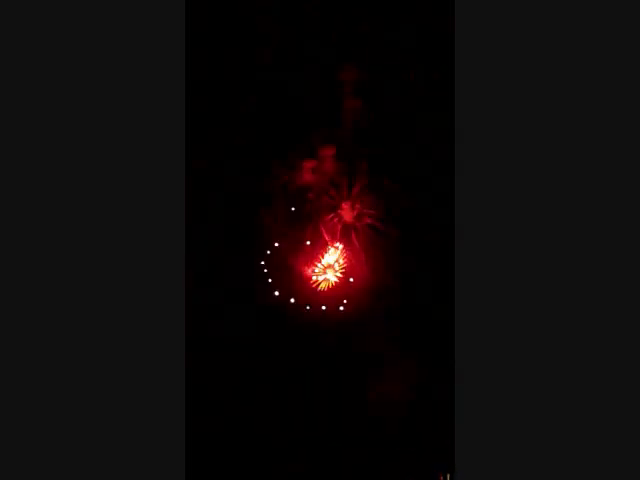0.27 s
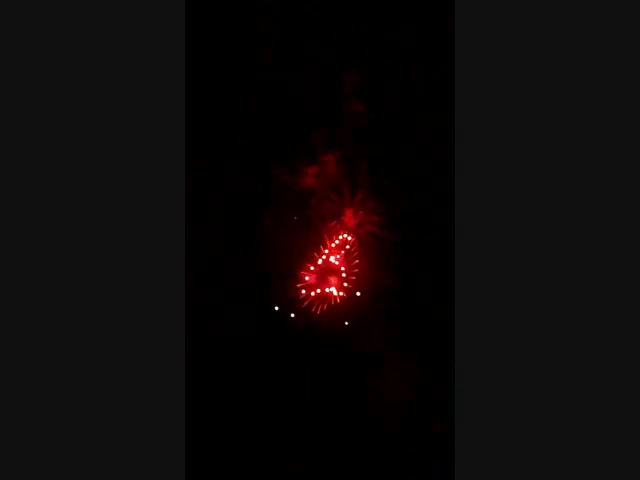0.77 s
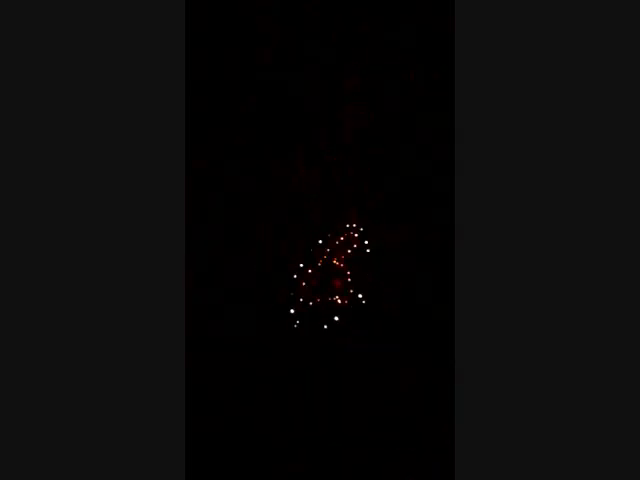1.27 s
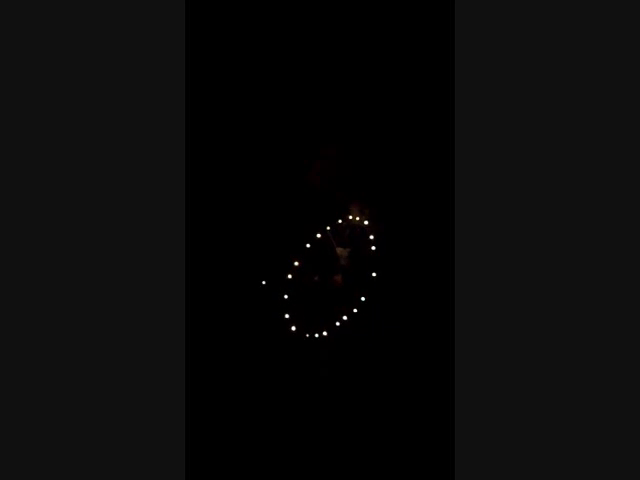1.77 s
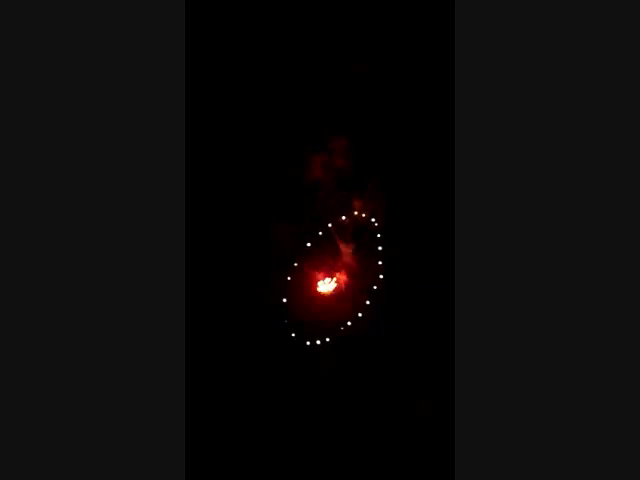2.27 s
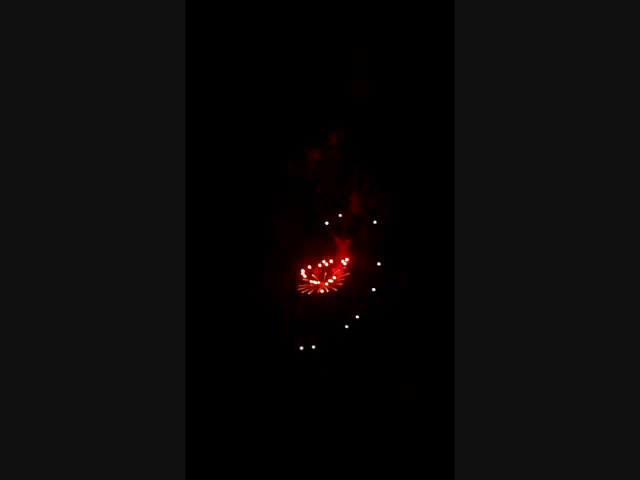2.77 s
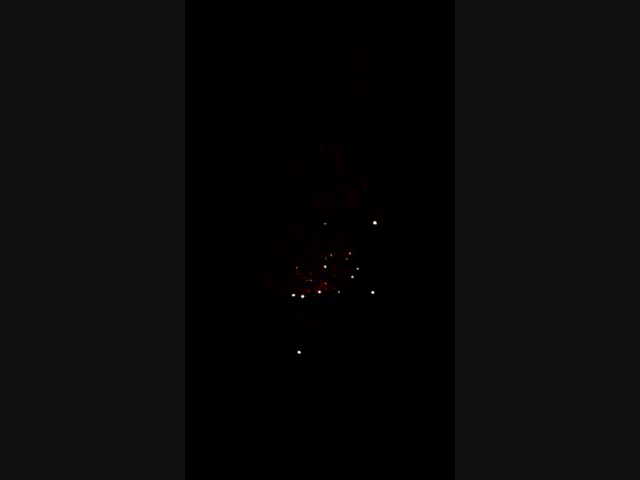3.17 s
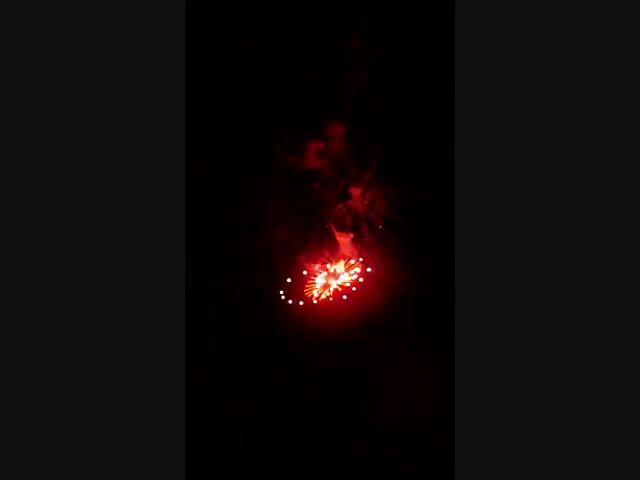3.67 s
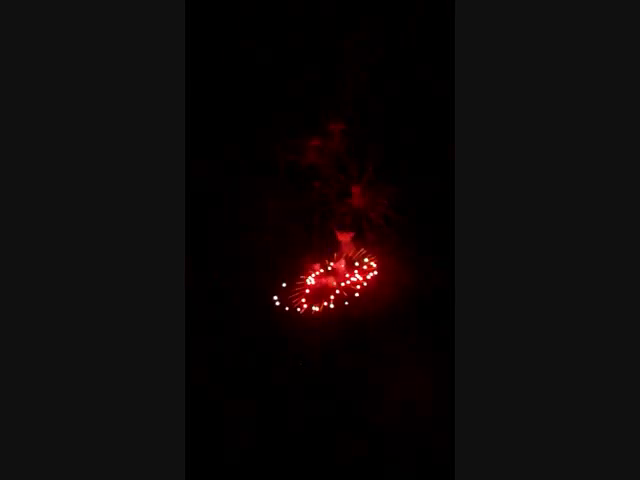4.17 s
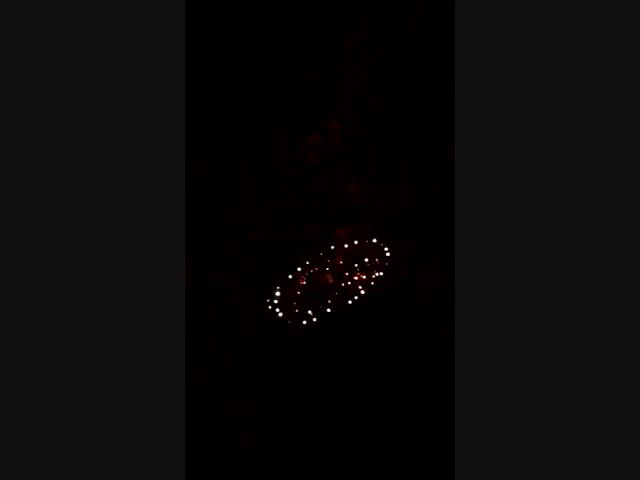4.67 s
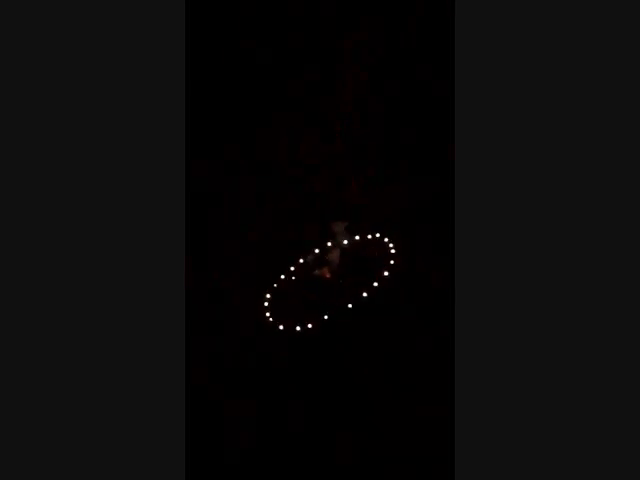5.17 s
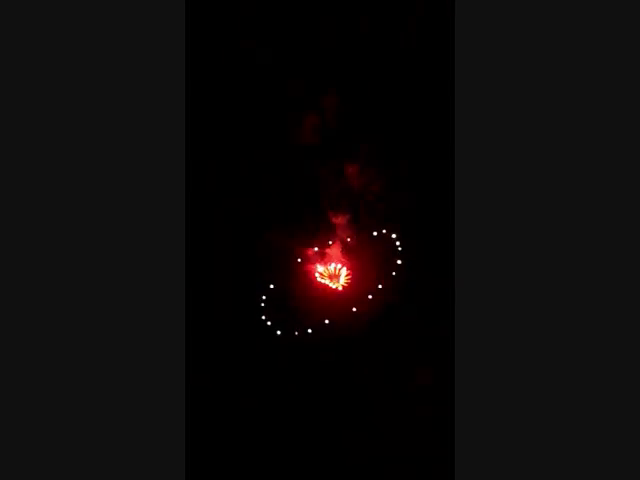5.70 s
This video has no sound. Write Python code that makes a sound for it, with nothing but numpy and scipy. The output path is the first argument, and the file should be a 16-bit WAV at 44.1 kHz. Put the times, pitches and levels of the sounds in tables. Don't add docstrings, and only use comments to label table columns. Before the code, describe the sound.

Outdoor aerial fireworks in mono, close and distorted. Deep launch thumps alternate irregularly with short, hard shell bangs that clip. The roar dips briefly after most bangs, then swells back as distant buildings return low booms. Bright scatter and slaps come from a nearby wall; gritty fuzz follows the loudness, and treble is cut off. The rumble never stops.

```python
import sys
import numpy as np
from scipy import signal
from scipy.io import wavfile
from scipy.ndimage import uniform_filter1d

SR = 44100
rng = np.random.default_rng(int(sys.argv[2]) if len(sys.argv) > 2 else 0)


def attenuation_scalar(level_db):
    decades = np.asarray(level_db, float) / 20
    return 10 ** decades


def unload_wav(signal):
    wavfile.write(
        sys.argv[1],
        SR,
        np.round(np.clip(np.atleast_2d(signal).T, -1, 1) * 32767).astype(np.int16),
    )


N = 261954

# t/s, strength/dB, bass/dB, brightness/(dB/octave)
LAUNCH_RETURNS = [
    (-.38, 1.5, -8, 0.6),
    (.4449, 2, -3.5, -0.2),
    (1.5092, -3.5, 2, -2.5),
    (3.8443, -3, -3.5, -5.7),
    (5.3095, 2, 0, -0.5),
]
SHELL_RETURNS = [
    (-1.07, -2, -8.5, .1),
    (1.4042, 0, -1.4, -0.66),
    (3.5, -1, -11.5, 0.68),
    (4.5, 1, -0.3, 0.18),
]
# delay/s, level/dB
LAUNCH_SWELL = [(0, -61), (.18, -51.5), (.23, -38.5), (.32, -30), (.43, -31.5), (.55, -38), (.8, -43),
                (1.5, -52.5)]
SHELL_SWELL = [(0, -45), (.13, -34.5), (0.299, -30), (.45, -26), (0.551, -24.5), (.73, -25), (.9, -29.5),
               (1.7, -29), (2.15, -38.5)]
LATE_DB_PER_S = 5
# offset/dB, share, early lift/dB, lift decay/s, floor/dB
RUMBLE_LAW = (-11, 0.37, 6.5, 0.28, -27)
BOOM_LAW = (-12, 0.8048, 13.5, 0.2251, -44)
ROAR_LAW = (0.23, 1.1019, 0.8, 1, -40)
BRIGHT_DB, DULL_DB, DULLING_S, AGEING_DB_PER_S = 5.5, -1, 0.33, 1.02
# f/Hz, density/dB
RUMBLE_SPECTRUM = [(8.8, -27), (15, -5.5), (37, -0.5), (86, -1), (135, -3.5), (170, -8.5), (220, -36),
                   (370, -120)]
BOOM_SPECTRUM = [(100, -33.5), (170, -5.5), (231, -9), (400, -11.5), (520, -49), (880, -120)]
ROAR_SPECTRUM = [(250, -34), (420, -11), (490, -4), (561, -1.5), (640, -11), (772, -11.5), (899, -9),
                 (1000, -11.5), (1570, -18), (2000, -23), (2400, -24.5), (3200, -34.5), (3700, -41.5),
                 (4500, -42), (9000, -120)]
# t/s, drop/dB, recovery/s
DUCKS = [
    (0.452, 10, 0.22),
    (1.27, -6.5, .16),
    (3.476, 8, 0.13),
    (3.853, 8.5, 0.51),
    (4.54, 3, .14),
    (5.319, 9.5, 0.28),
]

# delay/s, peak level/dB, f/Hz, length/cycles
LAUNCH_BOOMS = [(0.0953, -24.5, 56.8, 2.1), (0.165, -20.5, 53.8, 3.4), (0.2133, -8, 59.2, 0.79),
                (0.2764, -17, 54.8, 1.7), (0.2926, -10.5, 97.2, 1.4), (0.3206, -13.5, 64.2, 2.5),
                (0.3376, -20, 102, 4), (0.367, -19.5, 85, 2.4), (0.413, -17, 55.4, 2.3),
                (0.449, -20.5, 143, 1.7), (0.4722, -34, 62.2, 1.2), (0.6053, -25.5, 86.5, 2.3)]
# delay/s, peak level/dB, f/Hz, length/cycles
SHELL_BOOMS = [(0.0801, -18, 75, 1.7), (0.1027, -8, 138.4, 2.3), (0.1838, -12.5, 96.7, 1.6),
               (0.2064, -10, 52, 2.5), (0.2887, -15.5, 54.2, 2.3), (0.3096, -4, 118, 0.7),
               (0.3811, -7.5, 100, 1.1), (0.4096, -17.5, 85.6, 1.5), (0.4548, -21, 66, 1.5),
               (0.5304, -6.5, 87, 0.7), (0.5527, -13, 139, 1.9), (0.5757, -21.5, 101, 2.5),
               (0.5912, -12.5, 64.4, 4.4), (0.6184, -11, 117, 1.7), (0.6715, -14.5, 98.3, 3),
               (0.7079, -15, 54.7, 1.1), (0.8061, -8, 55.8, 0.61), (0.8868, -6.5, 65.4, 1.1),
               (0.9972, -17, 55.5, 1.7), (1.0587, -20, 59, 0.84), (1.2064, -13, 103.6, 2.8),
               (1.2892, -13, 64.7, 2.1), (1.4161, -18.5, 87.3, 3.7), (1.6007, -11, 100, 2.2),
               (1.624, -9, 135, 3.1), (1.788, -8.5, 98, 0.36)]
# t/s, peak level/dB, f/Hz, length/cycles
STRAYS = [(0.2757, -17, 49.8, 2.1), (0.8449, -15, 50, 2.6), (1.4132, -15.5, 57.6, 2.6),
          (1.459, -7.5, 76, 0.98), (1.7964, -10.5, 135, 1.7), (1.805, -12.5, 50, 1.4),
          (1.9002, -11.5, 50.1, 2.1), (1.9066, -12.5, 100, 2.6), (1.9583, -9.5, 136, 2.1),
          (1.9619, -16.5, 76, 2.4), (2.0576, -9.4, 116, 0.9), (2.0821, -16, 50, 1.9),
          (2.8159, -16.5, 76, 3.2), (3.2739, -15.7, 50, 2.6), (3.3642, -16, 87, 2.6),
          (4.2395, -10, 87, 2.2), (4.5088, -11, 58, 0.67), (4.82, -14, 100, 2.3), (4.8712, -9, 87, 0.6),
          (4.9211, -7.5, 75.4, 0.9), (5.0032, -11.5, 86.6, 2.6), (5.0766, -16, 50, 1.3),
          (5.0853, -12.6, 87, 2.6), (5.1329, -11.5, 58, 1.5), (5.1565, -11.5, 75.6, 1.9),
          (5.2567, -12, 115, 1.9), (5.5238, -14.4, 76, 1.9), (5.7197, -13, 115, 2.6),
          (5.7832, -15, 76.4, 2.6), (5.9265, -15.5, 100, 2.4)]
# t/s, peak level/dB, f/Hz, length/cycles
SWINGS = [(.4525, -1, 85, .6), (1.2680, 4, 70, .7), (1.2822, -5, 105, 2.2), (1.5160, -1, 70, .6),
          (3.4735, -12, 120, .7), (3.5195, -15, 240, 1.5), (3.8520, -3, 85, .6), (4.534, 4, 42, .6),
          (4.549, -8, 95, 1.5), (4.6075, -8, 82, 1.2), (5.3170, -1, 80, .6)]

# t/s, peak level/dB, push/ms, rise/ms
LAUNCHES = [
    (.4449, 1, 5.6, .8),
    (1.5097, -4, 3.6, .9),
    (3.8443, 1, 4.8, .3),
    (5.3100, 1, 5.2, .6),
]
LAUNCH_SUCTION = .82
GROUND_MS, GROUND_DB, GROUND_PUSH_MS = .5, 7, .5
# t/s, peak level/dB, push/ms
SHELLS = [
    (1.2586, 13, 2.45),
    (3.4628, 14, 1.45),
    (4.5243, 15, 1.8),
]
SHELL_SUCTION, SHELL_GROUND_DB = .85, -9
# t/s, peak level/dB, push/ms, suction depth
BOUNCES = [
    (1.2632, 10.5, 1.2, 1),
    (1.2645, 8, 1.5, 1.2),
    (3.4656, 10.5, .7, 1.4),
    (3.4669, 8, 1.3, 1.4),
    (3.4681, 0, 1.1, .6),
    (4.5270, 13.5, .5, 1.5),
    (4.5283, 9, .9, 1.5),
    (4.5297, 0, 1.0, 1.5),
]
BOUNCE_RISE_MS = .17
# f/Hz, density/dB
RIPPLE_SPECTRUM = [(200, -30.5), (600, -9), (1200, 0.5), (2500, -4), (5000, -32), (9000, -34)]

# t/s, near level/dB, near t60/s, wall level/dB, wall t60/s
BURSTS = [
    (1.259, -31.5, 0.3, -33.5, 0.69),
    (3.459, -43, 0.29, -48.5, 2.5),
    (4.5246, -35.5, 0.38, -37, 1.5),
]
NEAR_S, WALL_S = .011, .117
# t/s, peak level/dB, push/ms
SLAPS = [(1.3785, -7, .7), (1.3942, -6, .5), (1.5093, -2, .6), (1.889, -4, 1.0), (1.9585, -5, 1.0),
         (2.6825, -8, 1.0), (3.0435, -9, 1.0), (3.5835, -11, .6), (4.5193, 2, .8), (4.5785, -8, 1.5),
         (4.6443, -3, .8)]
# f/Hz, density/dB
SCATTER_SPECTRUM = [(600, -29.5), (1500, -3), (3000, -8.5), (4200, -21), (5200, -17.5), (7300, -26.5),
                    (9000, -29), (11700, -65)]

PORT_HZ, PORT_WIDTH_HZ = 4200, 1500
CAPSULE_HZ, CAPSULE_WIDTH_HZ, CAPSULE_DB = 7330, 3000, 5.5
# f/Hz, density/dB
GRIT_SPECTRUM = [(1500, -30.5), (3000, -4.5), (4500, -4), (6000, -2.5), (7200, -4.5), (8200, -9.5),
                 (9000, -7.5), (11700, -46.5)]
GRIT_SETTLE = 1 / 800
GRIT_FLOOR = .01


def evened(x):
    return x / np.sqrt(np.mean(x ** 2) + 1e-20)


def read(points, hz):
    f, value = np.transpose(points)
    return np.interp(np.log(hz + 1), np.log(f + 1), value)


def add(mix, s, sound):
    part = mix[round(s * SR):][:len(sound)]
    part += sound[:len(part)]


def noise(spectrum, size, patchy_db=0, flicker_db=0, tilt_db=0):
    hop = size // 4
    frames, hz = N // hop + 5, np.fft.rfftfreq(size, 1 / SR)
    real, imag, patches = rng.standard_normal((frames, len(hz), 3)).T
    patches = uniform_filter1d(patches, size=6, axis=0)
    patches = evened(uniform_filter1d(patches, size=8, axis=1))
    flicker = evened(uniform_filter1d(rng.standard_normal(frames), size=3))
    tilt = np.interp(np.arange(frames) * hop, np.arange(N), tilt_db * np.ones(N))
    octaves = np.log2(np.maximum(hz, 600) / 600)[:, None]
    level_db = read(spectrum, hz)[:, None] + patchy_db * patches + flicker_db * flicker + tilt * octaves
    bins = (real + 1j * imag) * attenuation_scalar(level_db)
    return evened(signal.istft(bins, nperseg=size, noverlap=size - hop)[1][:N])


def echoes():
    rows = []
    for returns, swell, aloft in ((LAUNCH_RETURNS, LAUNCH_SWELL, .1), (SHELL_RETURNS, SHELL_SWELL, 1)):
        delay, db = np.transpose(swell)
        for s, strength_db, bass_db, bright_db in returns:
            age = np.arange(0, N + 64, 64) / SR - s
            swell_db = np.interp(age, delay, db) - LATE_DB_PER_S * np.maximum(age - delay[-1], 0)
            strength_db = np.where(age < 0, -200, strength_db)
            constants = [np.full(len(age), float(v)) for v in (bass_db, bright_db, aloft)]
            rows.append((np.maximum(age, 0), strength_db, swell_db, *constants))
    return np.transpose(rows, (1, 0, 2))


def roll():
    age, strength_db, swell_db, bass_db, bright_db, aloft = echoes()

    def power(offset_db, share, early_db, early_s):
        early = aloft * early_db * np.exp(-age / early_s)
        return attenuation_scalar(strength_db + offset_db + share * swell_db + early) ** 2

    def full(v):
        return np.interp(np.arange(N), np.arange(len(v)) * 64, v)

    def level(law, deepness):
        echo_power = (power(*law[:4]) * attenuation_scalar(2 * deepness * bass_db)).sum(0)
        return full(np.sqrt(echo_power + attenuation_scalar(law[4]) ** 2))

    tilt_db = DULL_DB + bright_db + BRIGHT_DB * np.exp(-age / DULLING_S) - AGEING_DB_PER_S * age
    tilt_db = np.average(tilt_db, axis=0, weights=power(*ROAR_LAW[:4]))
    rumble = noise(RUMBLE_SPECTRUM, size=2048, patchy_db=.6, flicker_db=.4)
    boom = noise(BOOM_SPECTRUM, size=1024, patchy_db=1.0, flicker_db=2.5)
    roar = noise(ROAR_SPECTRUM, size=512, patchy_db=0.9, flicker_db=1.12, tilt_db=full(tilt_db))
    out = attenuation_scalar(1.0) * level(RUMBLE_LAW, .6) * rumble
    out += attenuation_scalar(3.0) * level(BOOM_LAW, -.4) * boom
    out += attenuation_scalar(3.0) * level(ROAR_LAW, 0) * roar
    return out


def ducking():
    drop_db, t = np.zeros(N), np.arange(2 * SR) / SR
    for s, db, recovery_s in DUCKS:
        add(drop_db, s, db * np.exp(-t / recovery_s))
    return attenuation_scalar(-drop_db)


def deep(rows, less_db):
    out, t = np.zeros(N), np.arange(-SR // 20, SR // 20) / SR
    for s, db, hz, cycles in rows:
        wave = -np.cos(2 * np.pi * hz * t - .3) * np.exp(-(t * hz / (.6 * cycles)) ** 2)
        add(out, s + t[0], attenuation_scalar(db - less_db) * wave)
    return out


def booms():
    rows = []
    for returns, walls in ((LAUNCH_RETURNS, LAUNCH_BOOMS), (SHELL_RETURNS, SHELL_BOOMS)):
        for s, strength_db, bass_db, _ in returns:
            for delay, db, hz, cycles in walls:
                if s + delay > 1 / 18:
                    rows.append((s + delay, strength_db + bass_db + db, hz, cycles))
    far = deep(rows, less_db=1.4) + deep(STRAYS, less_db=0.5)
    rough = attenuation_scalar(-17.5) * uniform_filter1d(abs(far), size=200) * noise(ROAR_SPECTRUM, size=512)
    return far + rough + deep(SWINGS, less_db=2.5)


def front(db, push_ms, suction, rise_ms, sign):
    t_ms = np.arange(SR // 10) / SR * 1000
    u = t_ms / push_ms
    rise = 1 - np.exp(-(t_ms / rise_ms) ** 2)
    return sign * attenuation_scalar(db) * rise * (1 - u ** 2) * np.exp(-suction * u ** 1.5)


def blasts():
    out = np.zeros(N)
    for s, db, push_ms, rise_ms in LAUNCHES:
        add(out, s, front(db, push_ms, LAUNCH_SUCTION, rise_ms, 0.92))
        tick = front(db + GROUND_DB, GROUND_PUSH_MS, 1.5, .3, -1)
        add(out, s + (rise_ms + GROUND_MS) / 1000, tick)
    for s, db, push_ms in SHELLS:
        add(out, s, front(db, push_ms, SHELL_SUCTION, .18 * push_ms, 1))
        ground = front(db + SHELL_GROUND_DB, .7 * push_ms, 1.5, .2 * push_ms, -1)
        add(out, s + .9 * push_ms / 1000, ground)
    for s, db, push_ms, suction in BOUNCES:
        add(out, s, front(db, push_ms, suction, BOUNCE_RISE_MS + .15 * push_ms, 1))
    strength = signal.lfilter([.02], [1, -.98], np.minimum(abs(out), 1))
    return out + attenuation_scalar(-22) * strength * noise(RIPPLE_SPECTRUM, size=256)


def scatter():
    level, slaps, t = np.zeros(N), np.zeros(N), np.arange(SR) / SR
    for s, near_db, near_t60, wall_db, wall_t60 in BURSTS:
        add(level, s + NEAR_S, attenuation_scalar(near_db - 60 * t / near_t60))
        add(level, s + WALL_S, attenuation_scalar(wall_db - 60 * t / wall_t60) * (1 - np.exp(-t / 0.0011)))
    for s, db, push_ms in SLAPS:
        add(slaps, s, front(db, push_ms, 1.1, .4 * push_ms, 1))
    return level * noise(SCATTER_SPECTRUM, size=256, patchy_db=1, flicker_db=.5) + slaps


def scene():
    return (ducking() * roll() + booms() + blasts() + scatter())[None]


def roll_off(x):
    return signal.sosfilt(signal.butter(12, 9170, fs=SR, output="sos"), x)


def record(dry):
    x = np.clip(dry, -1.0, 1.02)
    x = signal.lfilter(*signal.iirnotch(PORT_HZ, PORT_HZ / PORT_WIDTH_HZ, SR), x)
    lift = signal.lfilter(*signal.iirpeak(CAPSULE_HZ, CAPSULE_HZ / CAPSULE_WIDTH_HZ, SR), x)
    x = x + attenuation_scalar(CAPSULE_DB) * lift
    remembered = signal.lfilter([GRIT_SETTLE], [1, GRIT_SETTLE - 1], np.minimum(abs(x), .25))
    grit_level = np.hypot(x, GRIT_FLOOR + .5 * remembered)
    x = x + attenuation_scalar(-39.5) * grit_level * noise(GRIT_SPECTRUM, size=256)
    x = signal.sosfilt(signal.butter(1, 4, "high", fs=SR, output="sos"), x)
    edge = signal.firwin(61, 8700, window=("kaiser", 8), fs=SR)
    x = signal.oaconvolve(x, edge[None], "same")
    mix = np.clip(x, -1, 1)
    return roll_off(mix)


dry = scene()
out = record(dry)
unload_wav(out)
```